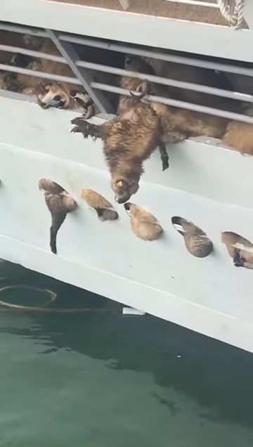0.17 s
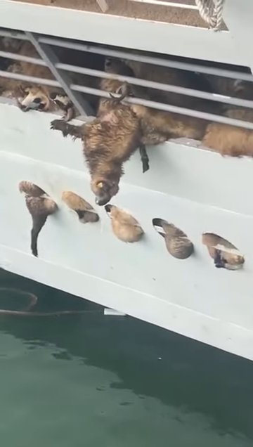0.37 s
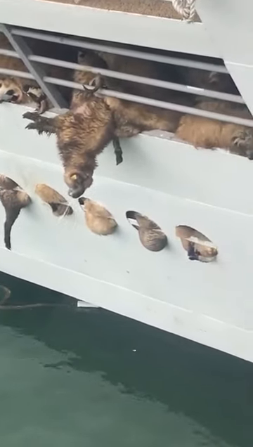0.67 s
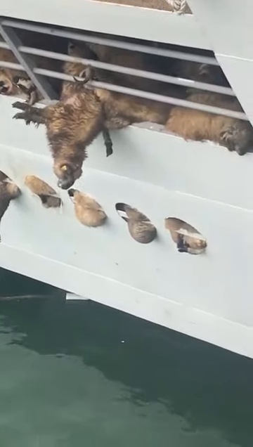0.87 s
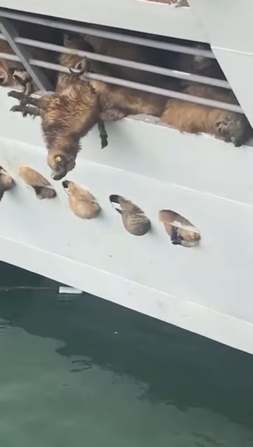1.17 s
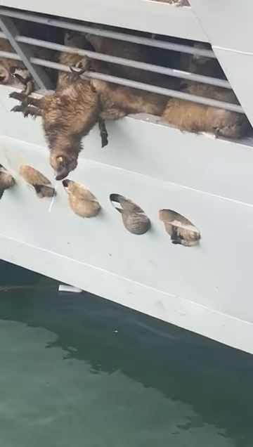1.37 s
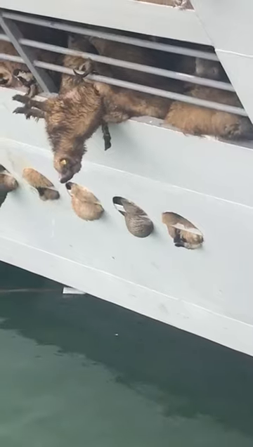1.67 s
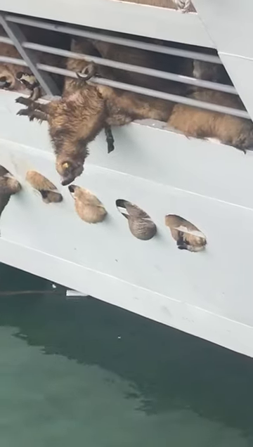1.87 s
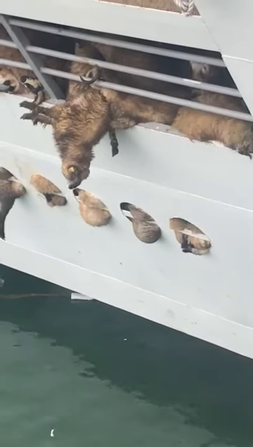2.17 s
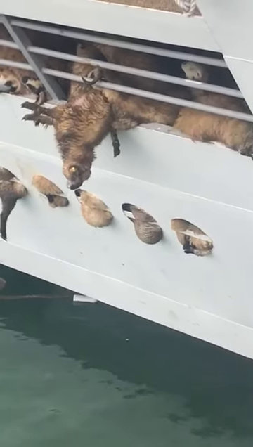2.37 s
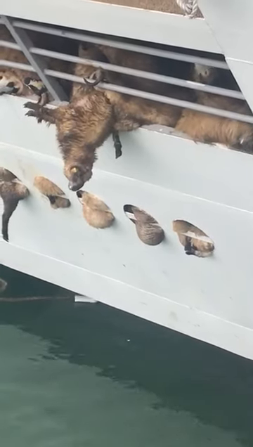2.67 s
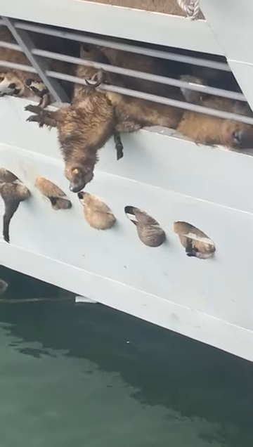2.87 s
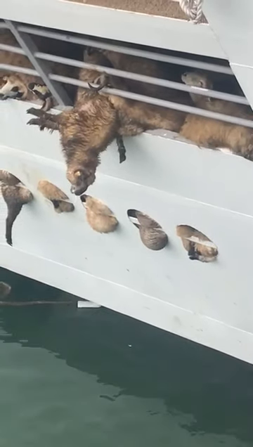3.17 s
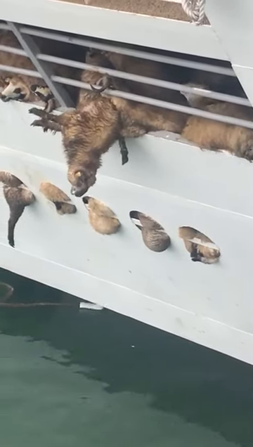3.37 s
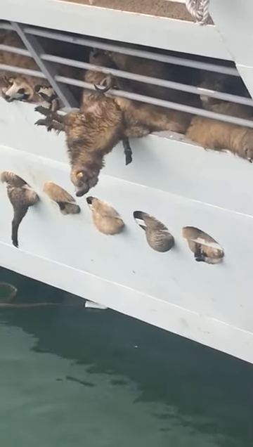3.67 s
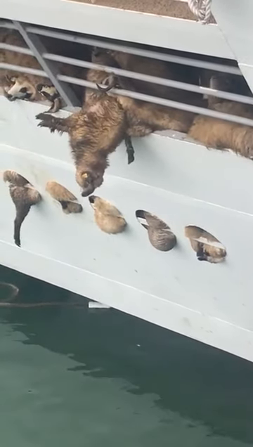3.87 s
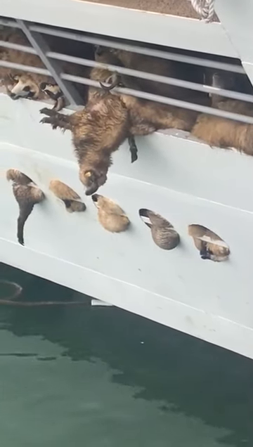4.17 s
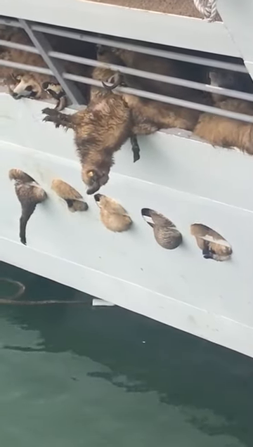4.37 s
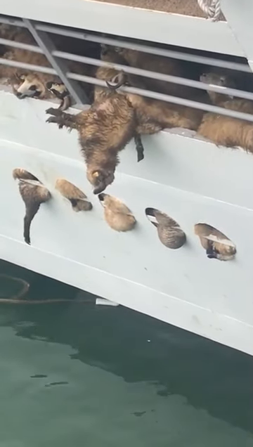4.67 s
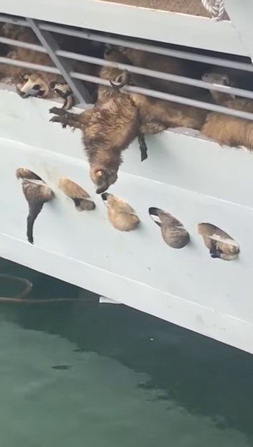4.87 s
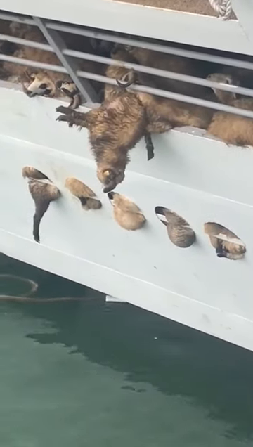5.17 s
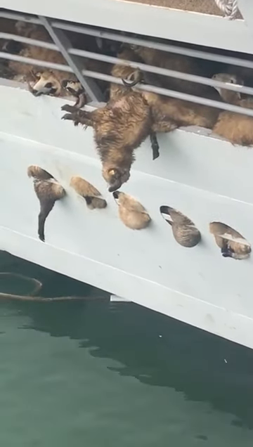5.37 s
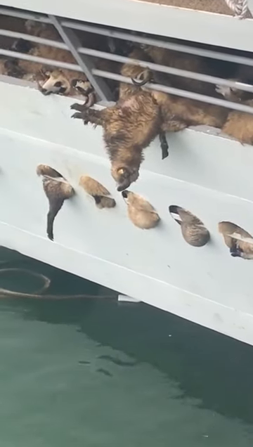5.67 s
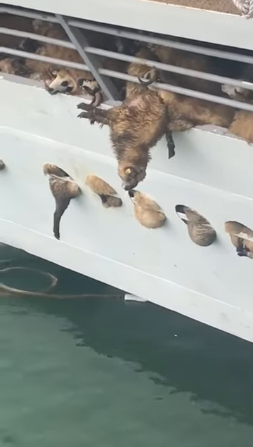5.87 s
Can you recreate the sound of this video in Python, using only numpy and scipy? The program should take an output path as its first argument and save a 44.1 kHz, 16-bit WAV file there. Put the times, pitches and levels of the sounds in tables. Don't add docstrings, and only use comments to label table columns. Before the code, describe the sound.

A steady low ship's engine drone rumbles and throbs across harbour water, with soft air hiss, a few tiny ticks and a closing scrape.

```python
import sys
import numpy as np
from scipy import signal
from scipy.fft import rfft, irfft
from scipy.io import wavfile
from scipy.ndimage import uniform_filter1d

SR = 44100
rng = np.random.default_rng(int(sys.argv[2]) if len(sys.argv) > 2 else 0)


def ratio(d):
    e = np.asarray(d, float) / 20
    return 10 ** e


def generate_wav(sig):
    pcm = np.round(np.clip(np.atleast_2d(sig).T, -1, 1) * 32767).astype(np.int16)
    wavfile.write(sys.argv[1], SR, pcm)


N = 264776

DIESEL_HZ = 5.417
THROB_S = 1.812


def evened(x):
    return x / np.sqrt(np.mean(x ** 2) + 1e-20)


def along(times_s, values):
    return np.interp(np.arange(N) / SR, times_s, values)


def drift(top_hz):
    hz = np.geomspace(.1, top_hz, num=16)
    start = rng.random(16)
    t = np.arange(0, N + 256, 256) / SR
    waves = np.sin(2 * np.pi * (hz * t[:, None] + start)) / np.sqrt(hz)
    return along(t, evened(waves.sum(axis=1)))


def resonate(x, hz, width_hz):
    centre_hz = min(hz, SR / 2 - 2000)
    b, a = signal.iirpeak(centre_hz, hz / width_hz, SR)
    return signal.lfilter(b, a, x)


def density_db(spectrum, hz):
    table_hz, table_db = np.transpose(spectrum)
    return np.interp(np.log(hz + 1), np.log(table_hz + 1), table_db, right=-140)


def noise(spectrum, patchy_db, flicker_db):
    frames = N // 512 + 8
    hz = np.fft.rfftfreq(2048, 1 / SR)
    real, imaginary, patches = rng.standard_normal((frames, 1025, 3)).T
    patches = uniform_filter1d(patches, size=24, axis=0)
    patches = evened(uniform_filter1d(patches, size=10, axis=1))
    flicker = evened(uniform_filter1d(rng.standard_normal(frames), size=8))
    shape_db = density_db(spectrum, hz)
    level_db = shape_db[:, None] + patchy_db * patches + flicker_db * flicker
    z = (real + 1j * imaginary) * ratio(level_db)
    power = (ratio(shape_db) ** 2).sum() * hz[1]
    wave = signal.istft(z, nperseg=2048, noverlap=1536)[1][2048:N + 2048]
    return np.sqrt(power) * evened(wave)


def machine(speed_hz, orders, waver_db, in_step_s=0, locked_db=-31):
    turns = np.cumsum(speed_hz * np.ones(N)) / SR
    turns = turns - turns[round(in_step_s * SR)]
    total = np.zeros(N)
    for order, db in orders:
        level = np.sqrt(2) * ratio(db + waver_db * drift(1.58))
        start = (db < locked_db) * rng.random()
        total += level * np.cos(2 * np.pi * (order * turns + start))
    return total


def beating(hz, db, other_hz, other_db, in_step_s):
    speeds_hz = np.array([hz * np.ones(N), other_hz * np.ones(N)])
    turns = np.cumsum(speeds_hz, axis=1) / SR
    turns = turns - turns[:, [round(in_step_s * SR)]]
    one, other = np.sqrt(2) * np.cos(2 * np.pi * turns)
    return ratio(db) * one + ratio(other_db) * other


def diesel():
    # order [multiple of the cycle], level/dB [rms]
    diesel_orders = [(6, -52), (9, -35), (10, -43), (11, -48), (12, -24.5), (13, -43), (15, -29),
                     (17, -41.5), (19, -42), (25, -38), (26, -42), (27, -39), (29, -44), (31, -44),
                     (40, -47), (39, -47), (47, -44), (50, -44)]
    return ratio(0.1) * machine(DIESEL_HZ, diesel_orders, waver_db=.8, in_step_s=THROB_S)


def pump():
    # order [multiple of the stroke rate], level/dB [rms]
    pump_orders = [(2, -29.3), (4, -50), (5, -50)]
    stroke_hz, sag_hz = 75.56, .47
    sag_from_s, sag_to_s, half_ramp_s = 1.85, 2.85, .3 / 2
    load = along([sag_from_s - half_ramp_s, sag_from_s + half_ramp_s,
                  sag_to_s - half_ramp_s, sag_to_s + half_ramp_s], [0, 1, 1, 0])
    hz = stroke_hz - sag_hz * load
    stroke = beating(hz, -27.5, 14 * DIESEL_HZ, -34.5, THROB_S)
    return machine(hz, pump_orders, waver_db=.6) + stroke


def generator():
    # order [multiple of the shaft], level/dB [rms]
    generator_orders = [(3, -38), (6, -39), (12, -33), (12.5, -45), (13.5, -46), (14, -44), (15, -46),
                        (50, -53)]
    shaft_hz = 15.034
    return ratio(-0.6) * machine(shaft_hz, generator_orders, waver_db=1.5)


def fans():
    # f/Hz, level/dB [rms]
    fan_tones = [(31.02, -41), (31.67, -42), (89.73, -38), (179.42, -39), (403.7, -45), (418.6, -46),
                 (433.4, -49), (448.8, -50), (672.2, -51)]
    return ratio(-0.2) * machine(1, fan_tones, waver_db=1.0)


def whine():
    ease_db, ease_s, ramp_s = -8, 2.6, 0.65
    level_db = -41 + ease_db * along([ease_s - ramp_s, ease_s + ramp_s], [0, 1])
    return beating(652.0, level_db, 650.88, -51, in_step_s=3.22)


def rumble():
    # f/Hz, level/dB [per Hz]
    roar_spectrum = [(22, -69), (34, -59), (46, -46.5), (72, -44), (100, -47.5), (205, -47), (240, -52.5),
                     (500, -59.5), (600, -56.5), (780, -60), (1000, -59), (1500, -65), (2000, -72.5),
                     (3000, -85)]
    hz = np.fft.rfftfreq(N, 1 / SR)
    shape = ratio(density_db(roar_spectrum, hz))
    flat = noise([(1, 0), (4000, 0)], patchy_db=.5, flicker_db=-0.2)
    roar = evened(irfft(rfft(flat) * shape, N))
    return np.sqrt((shape ** 2).sum() * hz[1]) * roar


def ventilation():
    # f/Hz, level/dB [per Hz]
    air_spectrum = [(1200, -78), (2200, -75), (3000, -78.5), (4500, -80), (4950, -85), (5500, -85),
                    (7000, -87.5), (7600, -89), (8300, -87.5), (9000, -91), (10300, -95), (11400, -95),
                    (12500, -105)]
    # t/s [middle], level/dB [rise], half length/s
    gusts = [
        (.5, 0.5, .4),
        (3.3, .5, .8),
        (5.4, 1, .4),
    ]
    t = np.arange(N) / SR
    gust_db = sum(db * np.exp(-((t - s) / half) ** 2) for s, db, half in gusts)
    return noise(air_spectrum, patchy_db=.8, flicker_db=0.05) * ratio(gust_db - gust_db.mean())


def ticks():
    # t/s, level/dB [peak], f/Hz [centre], width/Hz, t60/s
    tick_events = [
        (.92, -51, 8500, 4000, .04),
        (2.3995, -41, 8000, 6000, .02),
        (2.404, -45, 6100, 700, .04),
        (2.409, -47, 9000, 5000, .06),
        (5.494, -46, 11250, 900, .05),
        (5.494, -42, 3850, 200, .09),
        (5.549, -37, 6200, 1800, .03),
    ]
    out = np.zeros(N)
    t = np.arange(4000) / SR
    for s, db, hz, width_hz, t60 in tick_events:
        burst = rng.standard_normal(len(t))
        tick = evened(resonate(resonate(burst, hz, width_hz), hz, width_hz))
        out[round(s * SR):][:len(t)] += ratio(db - 60 * t / t60) * tick
    return out


def scrape():
    # f/Hz, width/Hz, level/dB
    steel_modes = [(1650, 60, -2), (1950, 40, 3), (3690, 90, -3), (4000, 700, -1), (5200, 400, -8),
                   (6000, 1500, -8)]
    start_s, top_db, bite_s, let_go_db_per_s = 5.895, -37.5, .05, 70
    rub = rng.standard_normal(N)
    ring = np.zeros(N)
    for hz, width_hz, db in steel_modes:
        ring += ratio(db) * evened(resonate(resonate(rub, hz, width_hz), hz, width_hz))
    since = np.arange(N) / SR - start_s
    release_db = let_go_db_per_s * np.maximum(since - bite_s, 0)
    press = np.clip(since / bite_s, 0, 1) * ratio(top_db - release_db)
    return press * evened(ring)


def scene():
    machines = diesel() + pump() + generator() + fans() + whine()
    return (machines + rumble() + ventilation() + ticks() + scrape())[None]


def thinned(x, hole_from=1.8, hole_to=1.3, edge_hz=11860, flutter_hz=130):
    padded = np.pad(x, ((0, 0), (0, 2048)), "reflect")
    hz, t, z = signal.stft(padded, SR, nperseg=1024, noverlap=768, boundary="even")
    blocks = np.arange(len(t)) // 4
    chance = rng.standard_normal((blocks[-1] + 1, len(hz) + 1))
    patches = uniform_filter1d(chance[:, 1:], size=4, axis=1)
    patches = evened(uniform_filter1d(patches, size=2, axis=0))
    holes = patches > np.interp(hz, [4400, 10300], [hole_from, hole_to], left=np.inf)
    edge = edge_hz + flutter_hz * evened(uniform_filter1d(chance[:, :1], size=2, axis=0))
    kept = (~holes & (hz < edge))[blocks].T
    return signal.istft(z * kept, SR, nperseg=1024, noverlap=768)[1][..., :N]


def band_limit(x):
    return signal.sosfilt(signal.butter(12, 12130, fs=SR, output="sos"), x)


def record(dry):
    mix = thinned(dry)
    return band_limit(mix)


dry = scene()
out = record(dry)
generate_wav(out)
```